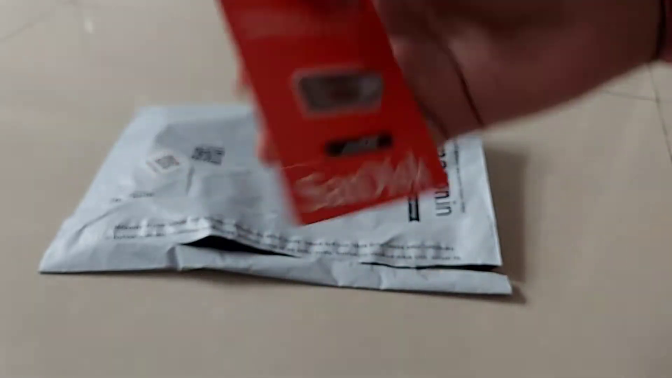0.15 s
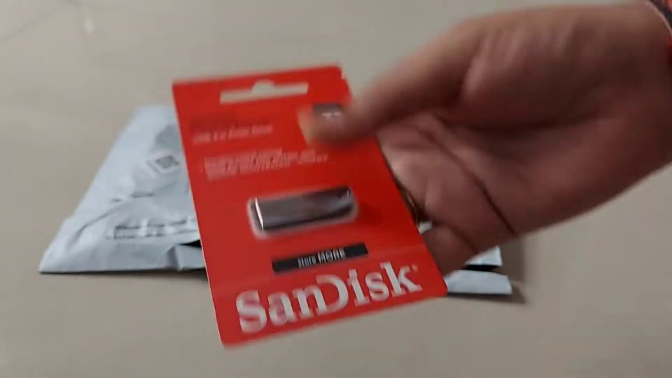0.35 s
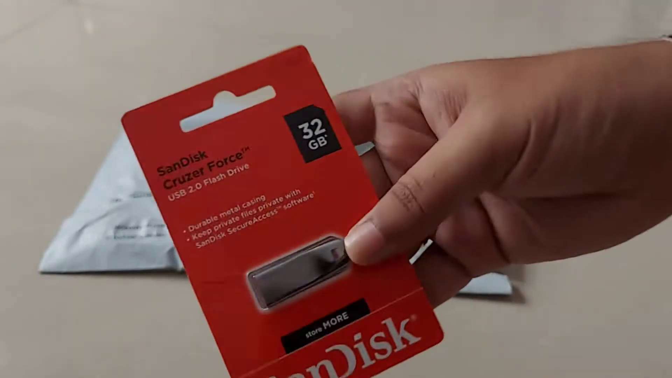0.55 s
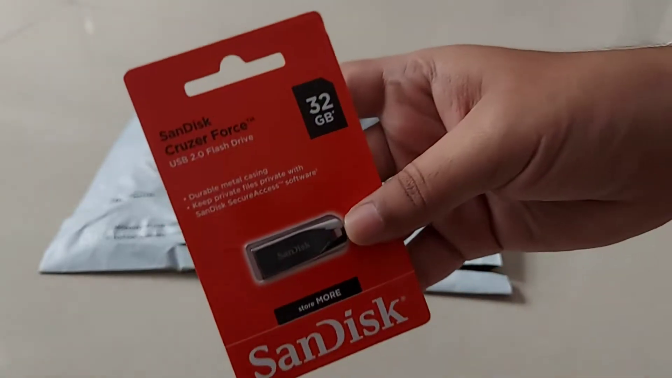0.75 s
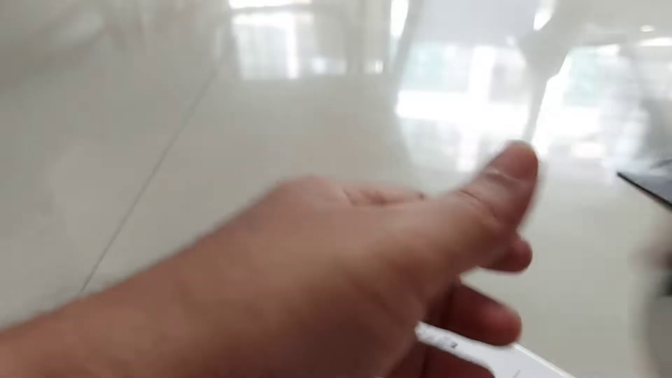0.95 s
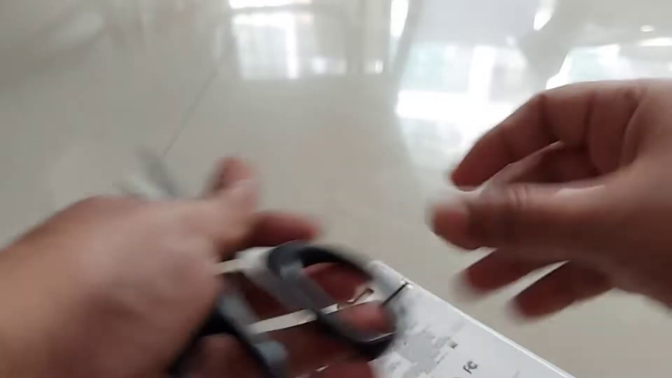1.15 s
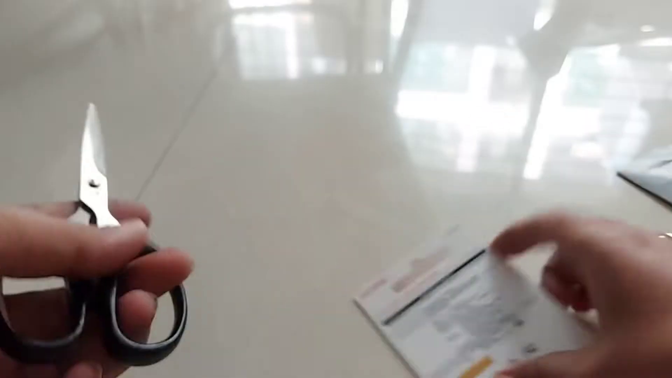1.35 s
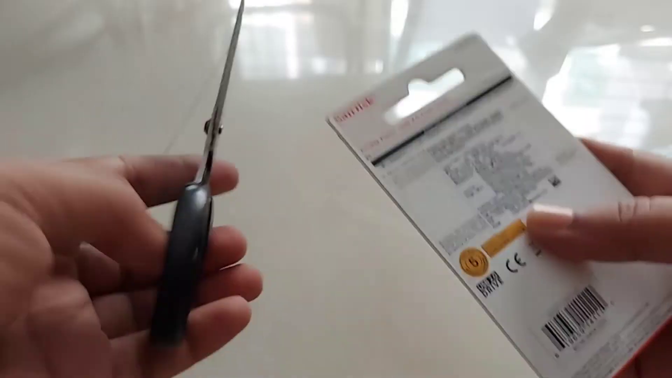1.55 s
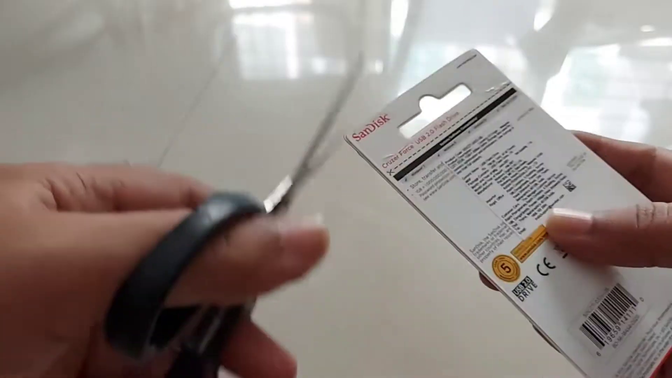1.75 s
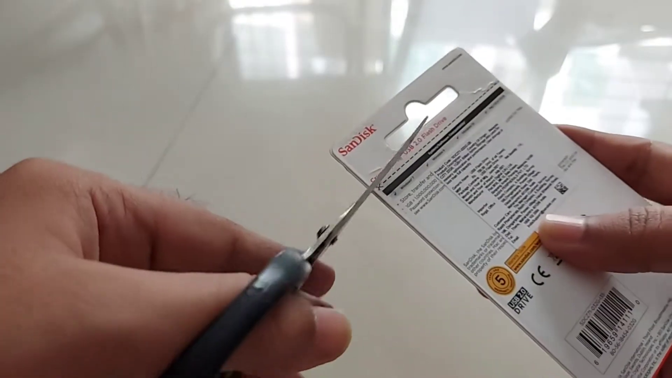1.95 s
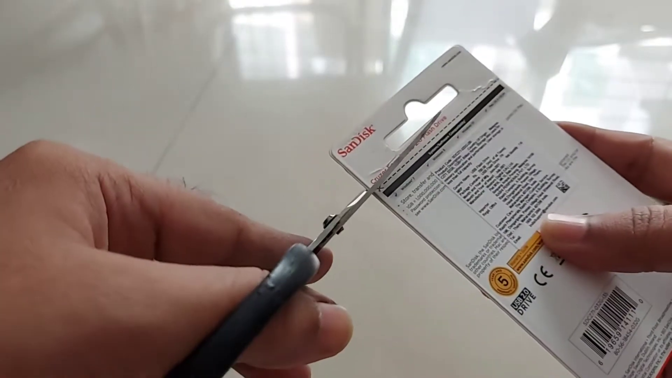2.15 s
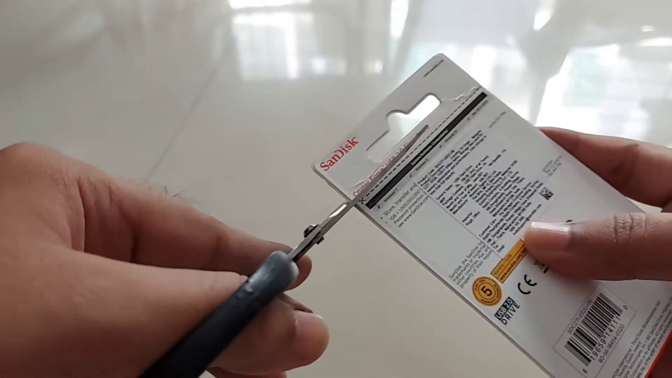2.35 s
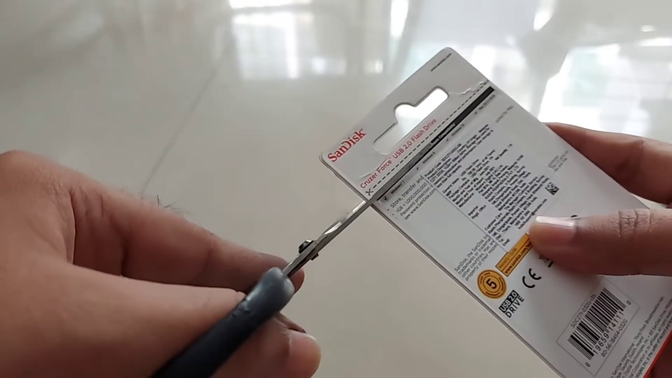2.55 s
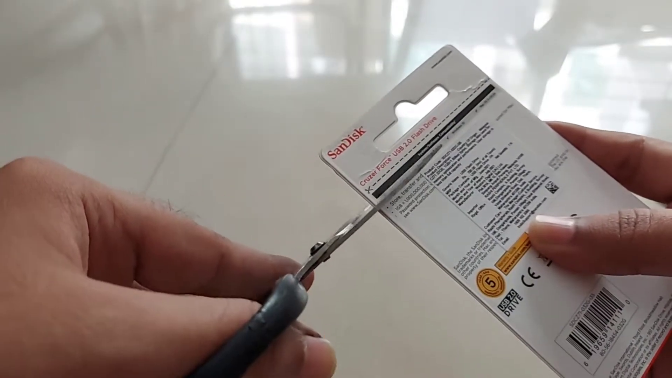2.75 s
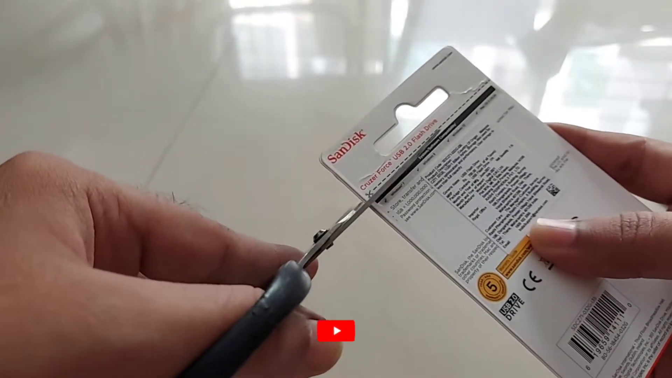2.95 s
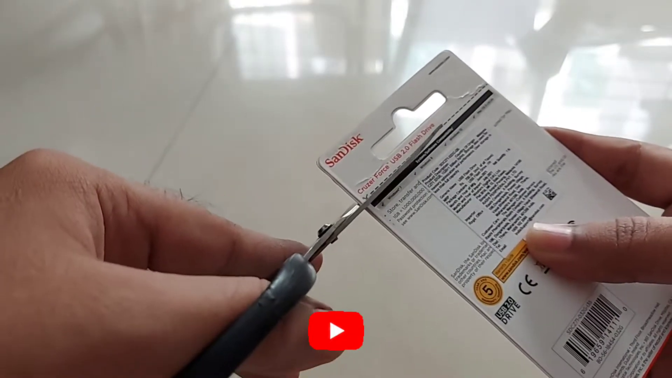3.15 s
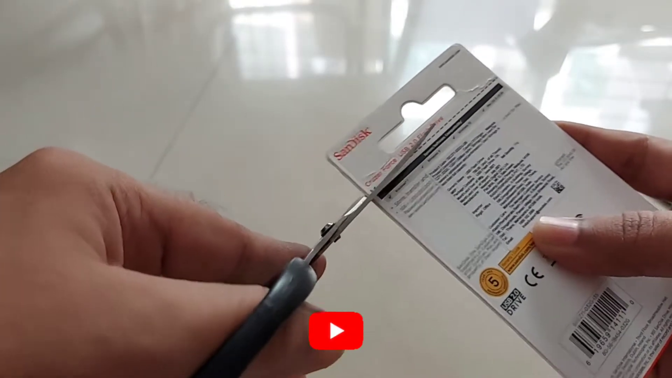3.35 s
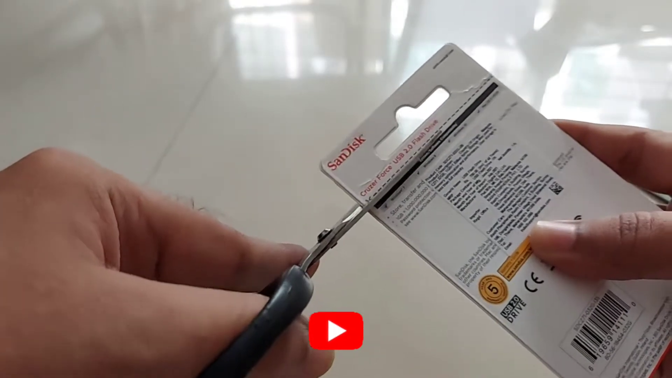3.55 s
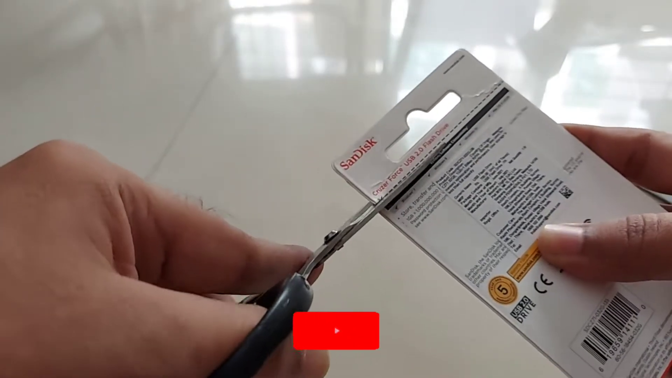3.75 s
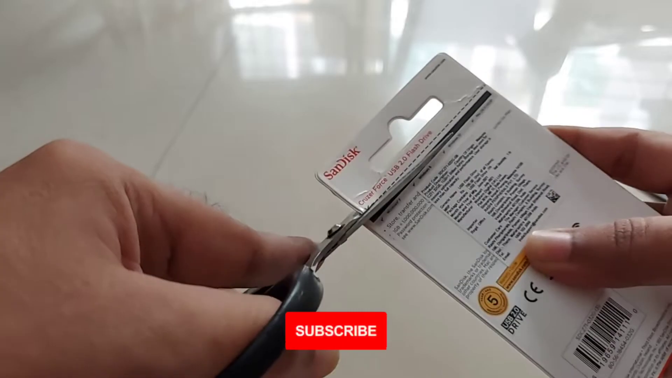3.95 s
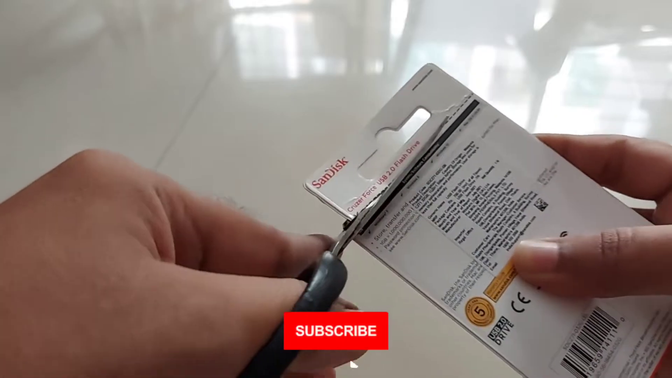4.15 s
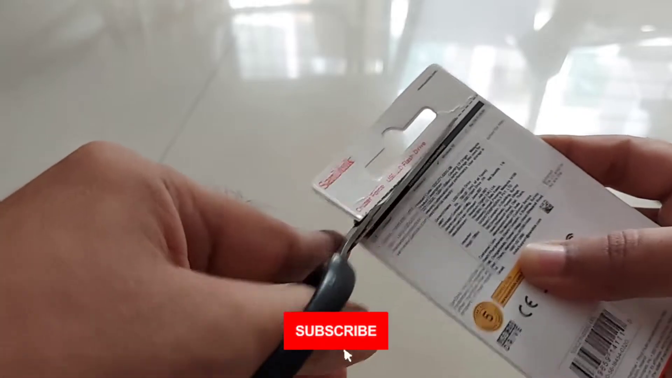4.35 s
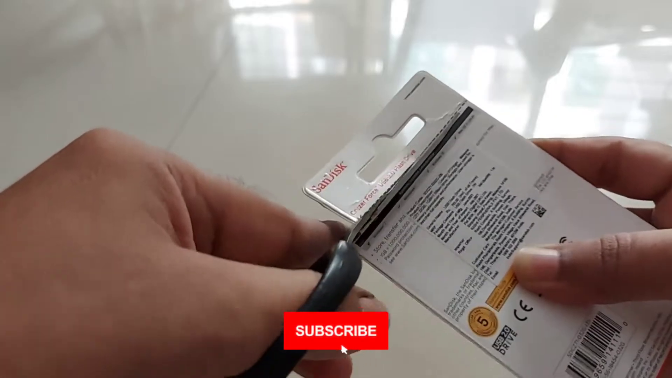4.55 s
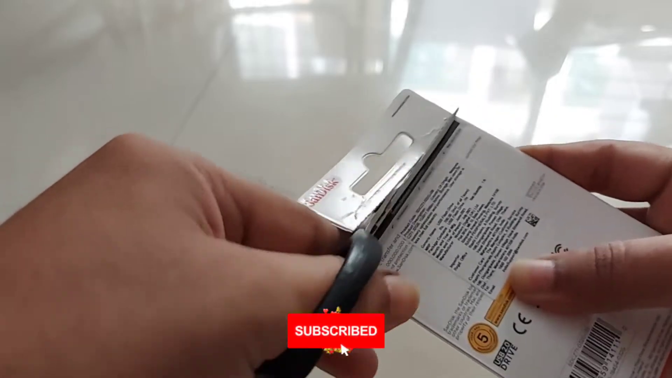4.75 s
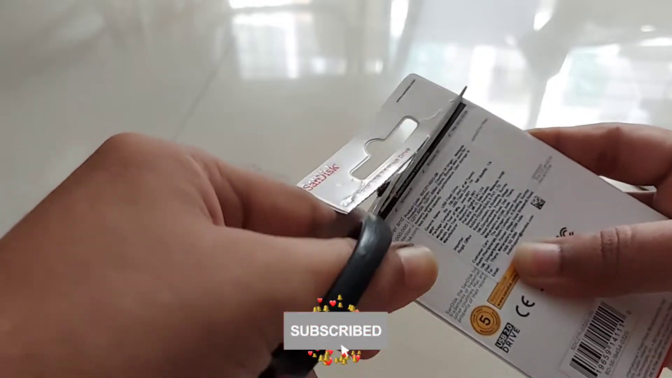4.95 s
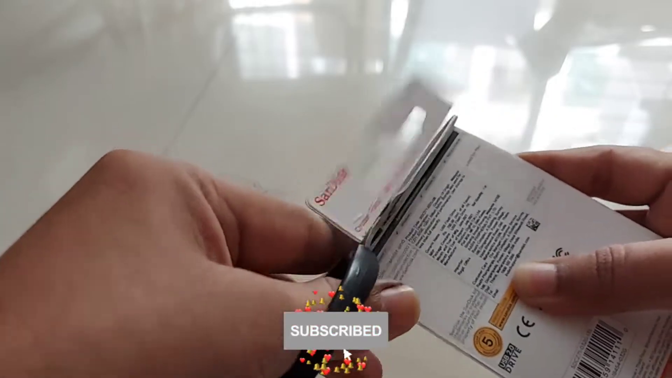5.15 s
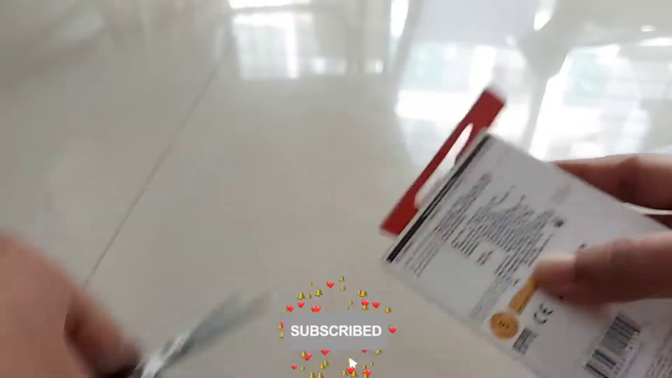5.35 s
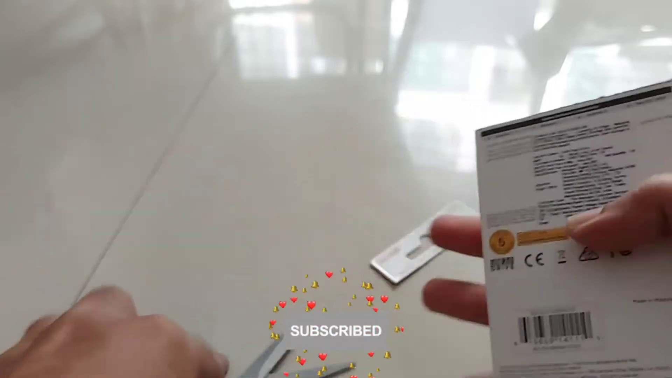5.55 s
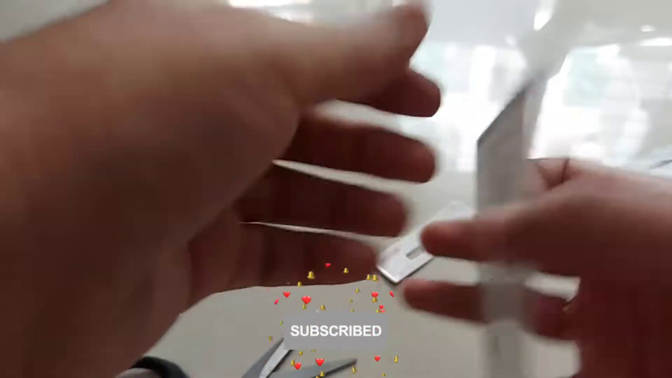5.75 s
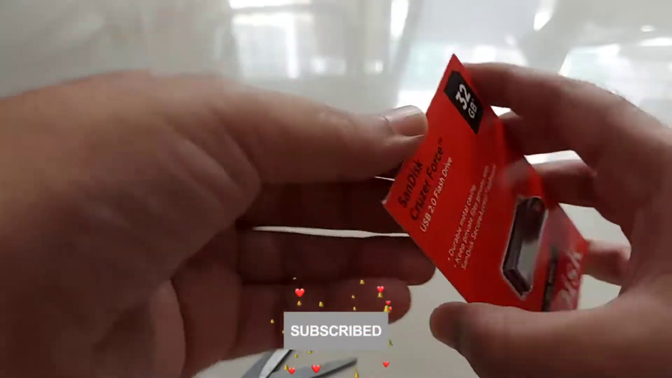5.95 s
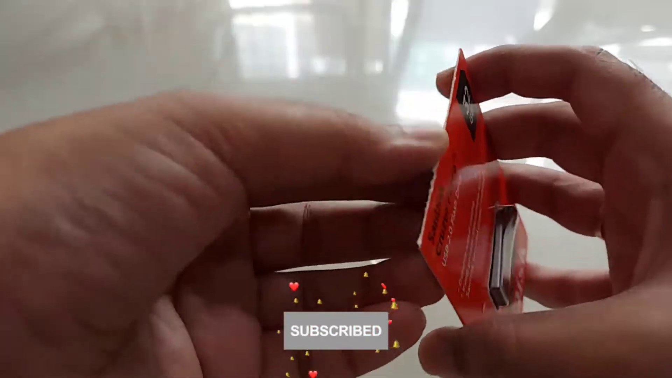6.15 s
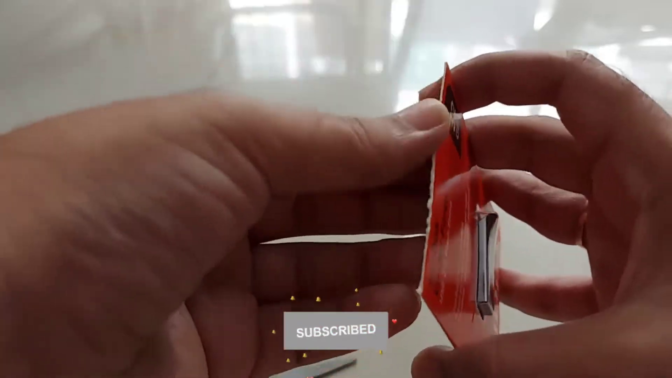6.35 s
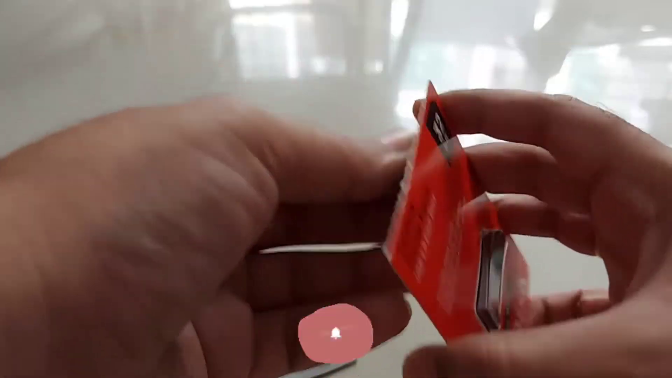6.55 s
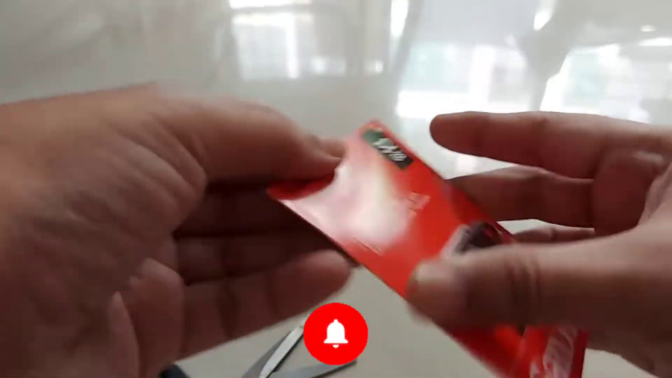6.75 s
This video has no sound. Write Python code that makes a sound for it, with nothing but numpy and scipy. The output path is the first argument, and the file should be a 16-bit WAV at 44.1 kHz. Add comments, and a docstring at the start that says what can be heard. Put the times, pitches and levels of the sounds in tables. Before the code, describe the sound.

A quiet indoor place with hard, reflective surfaces, heard close up over low rumble and a faint distant traffic wash. Fingers slide softly on card from 0 to 0.5 seconds. Scissors knock sharply at about 0.85, then clink lightly between 1.05 and 1.3, with card taps at 1.3 to 1.4. Five distant reverberant swishes, like a broom on tiles, come about every half second from 1.15 to 3.0. A very faint rising whistle at 3.4 is followed by a clearer one at 3.85. From 3.8 to 4.8 the blades crush and crack stiff card in irregular crisp jerks. At 5.16 they snap shut, the loudest sound, with a low air thump and dull knocks. A strip taps at 5.4, scissors clatter brightly down at 5.5 to 5.6, then light finger rubs and card taps continue to 6.8.

```python
"""Fingers slide over a card blister pack, then small steel scissors are picked up with clicks from a tiled floor.
Five far swishes, as of a broom on tiles, begin among the clicks and go on after them, in noise that dies away.
Later a thin whistle calls twice, gliding up, and the blades crush and break the card in jerks, as noise ringing
its resonances; then they snap shut with a puff of air, the strip drops, the scissors are laid down as bursts of
noise ring the steel, and fingers turn the card. Shaped noise rumbles throughout; a hard room answers near sounds."""
import sys
import numpy as np
from scipy import signal
from scipy.io import wavfile
from scipy.ndimage import uniform_filter1d

SR = 44100
rng = np.random.default_rng(int(sys.argv[2]) if len(sys.argv) > 2 else 0)


def master(y):
    """Save y as 16-bit WAV."""
    cut = np.clip(np.atleast_2d(y).T, -1, 1)
    pcm = np.round(cut * 32767)  # scale
    wavfile.write(sys.argv[1], SR, pcm.astype(np.int16))


N = 299880
TIME = np.arange(N) / SR


def from_db(db):
    """Turn decibels into a gain."""
    return 10 ** (np.asarray(db) / 20)


def rms_one(x):
    """Scale to unit power."""
    return x / np.sqrt(np.mean(x ** 2) + 1e-20)


def at_hz(points, hz):
    """Read a curve over frequency, with straight lines on a log-frequency axis."""
    points_hz, values = np.array(points).T
    return np.interp(np.log(hz), np.log(points_hz), values)


def over_time(rows):
    """Join (seconds, value) points by straight lines and read the curve at every sample."""
    s, values = np.transpose(rows)
    return np.interp(TIME, s, values)


def panned(pan_db):
    """Left and right gains at constant power; a positive pan makes the left louder."""
    return rms_one(from_db(np.array([[pan_db], [-pan_db]]) / 2))


def band(x, low, high):
    """Keep only what lies between two frequencies in hertz."""
    return signal.sosfilt(signal.butter(2, [low, high], "band", fs=SR, output="sos"), x)


def resonate(x, hz, width_hz):
    """Ring one resonance, with a gain of about 1 at its peak."""
    r = np.exp(-np.pi * width_hz / SR)
    feed = np.array([1, 0, -1]) * (1 - r * r) / 2
    feedback = [1, -2 * r * np.cos(2 * np.pi * hz / SR), r * r]
    return signal.lfilter(feed, feedback, x + 1e-18)


def add(out, s, sound):
    """Mix a sound in at time s, cutting off what falls outside the scene."""
    i = round(s * SR)
    sound, i = sound[:, max(-i, 0):], max(i, 0)
    out[:, i:i + sound.shape[1]] += sound[:, :max(N - i, 0)]


def wander(per_s):
    """Slow random drift with a spread of about 1: new chance values, per_s of them a second, joined by lines."""
    return np.interp(TIME * per_s, np.arange(200), rng.standard_normal(200))


def narrow_noise(hz, width_hz):
    """A narrow band of unit-power noise whose centre follows hz, stirred separately at each ear."""
    stir = rng.standard_normal((2, N)) + 1j * rng.standard_normal((2, N))
    stir = signal.sosfilt(signal.butter(2, width_hz / 2, fs=SR, output="sos"), stir)
    carrier = np.exp(2j * np.pi * np.cumsum(hz) / SR)
    return rms_one(np.real(stir * carrier))


# How alike the two ears are. Each row: frequency in Hz, left-right correlation (no unit).
EAR_LIKENESS = [(30, 0), (100, 0.56), (300, 0.68), (700, 0), (1500, 0), (4000, 0), (16000, 0.18)]
EDGES_HZ = 22 * 2 ** np.arange(0, 9.9, .5)   # edges of the half-octave bands


def noise_bands(size):
    """Half-octave bands of stereo noise, most alike at the ears in the bass around 100 to 300 Hz."""
    white = rng.standard_normal((2, 2, size))
    for k, (low, high) in enumerate(zip(EDGES_HZ, EDGES_HZ[1:])):
        mid, side = band(white[k % 2], low, high)   # neighbouring bands use different noise
        hz = np.sqrt(low * high)
        alike = np.clip(at_hz(EAR_LIKENESS, hz), -1, 1)
        yield hz, np.sqrt(1 + alike) * mid + np.sqrt(1 - alike) * side * [[1], [-1]]


def colour_noise(bands, spectrum):
    """Mix noise bands into one unit-power noise with the given spectrum."""
    return rms_one(sum(x * from_db(at_hz(spectrum, hz)) for hz, x in bands))


def dying_noise(spectrum, t60s):
    """One second of diffuse sound in which each band dies at its own pace."""
    t = TIME[:SR]
    return sum(x * from_db(at_hz(spectrum, hz) - 60 * t / at_hz(t60s, hz)) for hz, x in noise_bands(SR))


# Colour of the low rumble. Each row: frequency in Hz, relative strength in dB per Hz.
RUMBLE_COLOUR = [(13, -62), (22, -42.5), (32, -22), (40, -0.5), (55, -10.5), (76, 3), (172, -8), (282, -9),
                 (320, -26.5), (450, -39), (580, -51), (990, -120)]
# How loud the low rumble is. Each row: time in seconds, level in dB.
RUMBLE_LEVEL = [(0, -56.5), (.36, -54), (.65, -57.5), (1.2, -55.5), (1.5, -58.5), (3.0, -58.5), (4.0, -59),
                (5.9, -59.5), (6.8, -58)]


def outdoor_rumble(bands):
    """Bass-heavy noise whose level slowly drifts."""
    return from_db(over_time(RUMBLE_LEVEL)) * colour_noise(bands, RUMBLE_COLOUR)


# Swells of the low drone. Each row: middle in seconds, half length in seconds, level in dB.
DRONE_SWELLS = [(2.193, 0.12, -50), (2.68, 0.077, -51)]


def low_drone():
    """A low tone of slightly wandering pitch swells and sinks."""
    hz = 73.5 + 1.08 * wander(per_s=9.1)
    tone = rms_one(np.sin(2 * np.pi * np.cumsum(hz) / SR))
    swells = sum(from_db(db) * np.exp(-.5 * ((TIME - s) / half_s) ** 2) for s, half_s, db in DRONE_SWELLS)
    return swells * tone


# Colour of the traffic wash. Each row: frequency in Hz, relative strength in dB per Hz.
WASH_COLOUR = [(220, -32.5), (380, -33), (504, -12), (678, -4), (913, -5.5), (1390, -18), (1630, -14),
               (1850, -20.5), (2000, -40), (2370, -22), (3090, -39.5), (3350, -25.5), (5030, -33),
               (7790, -27.5), (16000, -39.5)]
# How the far traffic rises and falls. Each row: time in seconds, relative level in dB.
TRAFFIC_LEVEL = [(0.0, -70.5), (0.32, -66.5), (0.62, -73.5), (0.89, -67), (1.04, -62.5), (1.97, -70.5),
                 (3.5, -69), (3.67, -66.5), (5.3, -69), (5.61, -68.5), (6.27, -69.5), (6.8, -72)]
WASH_DB, WHIR_DB = -0.5, -2.5   # added to the traffic level
WHIR_SWING = 1.4   # the whir rises and falls this many times as far, in dB
WHIR_HZ, WHIR_WANDER_HZ = 715.4, 49.94


def far_traffic(bands):
    """A wash of coloured noise and a whir of narrow noise with wandering pitch, both led by one level."""
    level_db = over_time(TRAFFIC_LEVEL)
    mean_db = level_db.mean()
    wash = from_db(WASH_DB + level_db) * colour_noise(bands, WASH_COLOUR)
    whir_db = WHIR_DB + mean_db + WHIR_SWING * (level_db - mean_db)
    whir = from_db(whir_db) * narrow_noise(WHIR_HZ + WHIR_WANDER_HZ * wander(per_s=4), width_hz=120)
    return wash + whir


def background():
    """Rumble, drone and far traffic, all a little to the right."""
    bands = list(noise_bands(N))
    low = outdoor_rumble(bands) + low_drone()
    return panned(pan_db=-6.0) * low + panned(pan_db=-3.0) * far_traffic(bands)


# Calls of a thin whistle. Each row: start in seconds, length in seconds, starting pitch in Hz,
# relative level in dB before the echoes.
WHISTLES = [(3.38, 0.21, 1888, -75), (3.841, 0.36, 2387, -60.5)]
GLIDE_HZ_PER_S, WHISTLE_WIDTH_HZ = 1000, 85


def far_whistles(t60_s):
    """Each call swells and fades as its pitch climbs; echoes smear it into overlapping strands."""
    out = np.zeros((2, N))
    for s, length_s, hz, db in WHISTLES:
        age = np.clip(TIME - s, 0, length_s)
        swell = from_db(db) * np.sin(np.pi * age / length_s)
        out += swell * narrow_noise(hz + GLIDE_HZ_PER_S * age, WHISTLE_WIDTH_HZ)
    echoes = rng.standard_normal((2, SR)) * from_db(-60 * TIME[:SR] / t60_s)
    return signal.fftconvolve(out, echoes / np.linalg.norm(echoes[0]), axes=1)[:, :N]


# Far strokes. Each row: start in seconds, level in dB over the first fifteenth of a second.
SWISHES = [(1.155, -47.5), (1.661, -49), (2.100, -50.5), (2.502, -48.5), (3.005, -49)]
# Colour of a stroke. Each row: frequency in Hz, relative strength in dB per Hz.
SWISH_COLOUR = [(400, -23.5), (700, -4), (1300, -8), (1800, -3.5), (2300, 2.5), (3100, -1.5), (5000, -7),
                (7500, -5.5), (10000, -9.5), (13000, -15.5), (16000, -16)]
# How long a stroke rings on. Each row: frequency in Hz, time in seconds to fall by 60 dB.
SWISH_T60 = [(1000, 0.7), (2500, 0.49), (6000, 0.53), (14000, 0.2)]
LEFT_LAG_S, SHARED = 0.000452, 0.13   # delay at the left ear, share of the right ear's sound mixed into it


def far_swishes(rise_s, stroke_s, pan_db):
    """Short strokes far off to the right: they swell briefly and are heard mostly as reverberation."""
    out, t = np.zeros((2, N)), TIME[:SR]
    swell = (1 - np.exp(-t / rise_s)) * (1 - .5 * np.exp(-t / stroke_s))
    for s, db in SWISHES:
        left, right = dying_noise(SWISH_COLOUR, SWISH_T60) * swell
        late_right = np.interp(t - LEFT_LAG_S, t, right)
        x = np.array([np.sqrt(1 - SHARED ** 2) * left + SHARED * late_right, right])
        add(out, s, panned(pan_db) * from_db(db) * x / np.std(x[:, :SR // 15]))
    return out


# Colour of the room's answer. Each row: frequency in Hz, relative strength in dB.
ROOM_COLOUR = [(200, -5.5), (800, -4), (2500, 1.5), (7000, -2), (14000, 2)]
# How long the room rings. Each row: frequency in Hz, time in seconds to fall by 60 dB.
ROOM_T60 = [(300, 0.9), (2000, 0.26), (6000, 0.25), (14000, 0.2)]


def room(x, gap_s, build_s, wet_db):
    """Tiles and bare walls answer after a short gap with a dense tail."""
    since_gap = np.maximum(TIME[:SR] - gap_s, 0)
    tail = dying_noise(ROOM_COLOUR, ROOM_T60) * (1 - np.exp(-since_gap / build_s))
    tail = tail / np.sqrt(np.sum(tail ** 2, axis=1, keepdims=True))
    return from_db(wet_db) * signal.fftconvolve(x, tail, axes=1)[:, :N]


# Bass, middle and treble of a struck body. Each row: lower edge in Hz, upper edge in Hz.
ZONES_HZ = [(170, 1500), (1500, 6000), (6000, 16000)]


def body(force, modes, direct_db, zone_db, heard):
    """A force rings the modes; the bass, middle and treble levels are set over the stretch `heard`."""
    x = from_db(direct_db) * force
    for k, (hz, width_hz, db) in enumerate(modes):
        x = x + (-1) ** k * from_db(db) * resonate(force, hz, width_hz)
    # alternate signs join the zones without gaps
    zones = [(-1) ** k * band(x, *edges) for k, edges in enumerate(ZONES_HZ)]
    return sum(z * from_db(db) / np.sqrt(np.mean(z[:, heard] ** 2)) for z, db in zip(zones, zone_db))


def port_noise(size):
    """White noise at two microphone ports, shared only at long wavelengths."""
    own = rng.standard_normal((2, size))
    long_waves = signal.sosfilt(signal.butter(1, 1800, fs=SR, output="sos"), own)
    return own - long_waves + long_waves[0]


def blows(rows, modes, direct_db, scatter_db, rise_s, level_db):
    """Each contact is a brief burst of micro-impacts into the body; returns near sound and what reaches the room."""
    near, sent, t = np.zeros((2, N)), np.zeros((2, N)), TIME[:SR // 6]
    attack = slice(0, SR * 8 // 1000)   # levels are set over the first 8 ms
    for s, contact_s, low_db, mid_db, top_db, pan_db, *room_db in rows:
        force = port_noise(len(t)) * np.exp(-t / contact_s) * (1 - np.exp(-t / rise_s))
        zone_db = (low_db, mid_db, top_db)
        add(near, s, panned(pan_db) * body(force, modes, direct_db, zone_db, attack))
        # summed over all directions the modes stand out less, so the room hears a smoother crack
        add(sent, s, from_db(sum(room_db)) * body(force, modes, scatter_db, zone_db, attack))
    return from_db(level_db) * near, from_db(level_db) * sent


def scrapes(rows, modes, direct_db, friction, grains_per_s, grain_db, level_db):
    """A swell of friction noise with tiny slips of uneven size rings the body."""
    out, t = np.zeros((2, N)), TIME[:SR] - .5
    for s, half_s, low_db, mid_db, top_db, pan_db in rows:
        slip_here = rng.random(len(t)) < grains_per_s / SR
        slip_size = from_db(grain_db * np.minimum(rng.exponential(1, len(t)), 3))
        fade = np.exp(-1 / (0.00029 * SR))   # a slip dies to 1/e in 0.29 ms
        grain = signal.lfilter([1], [1, -fade], slip_here * slip_size)
        force = port_noise(len(t)) * (friction + grain) * np.exp(-.5 * (t / half_s) ** 2)
        sound = body(force, modes, direct_db, (low_db, mid_db, top_db), abs(t) < half_s)
        add(out, s + t[0], panned(pan_db) * sound)
    return from_db(level_db) * out


# Dull knocks of handles, strip and fingers. Each row: start in seconds, pitch in Hz,
# strength in dB before damping and panning.
KNOCKS = [(3.191, 1620, -45), (5.048, 268, -39.5), (5.1625, 218, -29), (5.211, 594, -36.5),
          (5.2766, 1150, -31), (5.582, 291, -32), (5.5964, 512, -34), (6.5734, 596, -38.5),
          (6.658, 113, -44)]
KNOCK_CYCLES = 1.13   # cycles in which a knock falls to 1/e


def knocks(pan_db):
    """A soft contact rings one heavily damped resonance."""
    out, t = np.zeros((2, N)), TIME[:SR // 10]
    for s, hz, db in KNOCKS:
        ring = np.sin(2 * np.pi * hz * t) * np.exp(-hz * t / KNOCK_CYCLES)
        add(out, s, panned(pan_db) * from_db(db) * ring)
    return out


# Fingers and card sliding. Each row: middle in seconds, half length in seconds,
# relative mid level in dB, bass above mid in dB.
RUBS = [(0.025, 0.16, -67.5, -4), (0.381, 0.095, -70, 5), (0.719, 0.34, -82, 4), (1.023, 0.017, -67, -6),
        (1.382, 0.088, -71.5, -25), (1.532, 0.15, -84, -13), (5.103, 0.023, -63.5, -3),
        (5.473, 0.033, -64.5, -0.5), (5.808, 0.013, -63.5, -10.5), (6.191, 0.012, -67, -13.5),
        (6.276, 0.014, -74.5, -7), (6.67, 0.083, -70, -2.5), (6.796, 0.0074, -59, -7)]
# Resonances of skin on card. Each row: frequency in Hz, width in Hz, relative strength in dB.
RUB_MODES = [(237, 220, 15.5), (504, 940, 6), (1750, 1000, -6.5), (4000, 2000, -10), (7130, 2700, -3),
             (13100, 14000, -2.5)]


def fingers(top_db, pan_db):
    """Skin and card slide over each other; a firmer grip adds bass."""
    rows = [(s, half_s, db + bass_db, db, db + top_db, pan_db) for s, half_s, db, bass_db in RUBS]
    return scrapes(rows, RUB_MODES, direct_db=-15.5, friction=1.0, grains_per_s=740, grain_db=1.2, level_db=-1.0)


# Crisp cracks and taps of the card. Each row: start in seconds, relative mid level in dB.
CARD_HITS = [(1.278, -42), (1.4199, -54), (5.0468, -43), (5.1037, -55), (5.4164, -47), (5.84, -61),
             (6.1856, -67), (6.571, -57.5)]
# Resonances of the card. Each row: frequency in Hz, width in Hz, relative strength in dB.
CARD_MODES = [(271.4, 25, 8.5), (650, 26, 7.5), (1200, 410, 0.5), (1720, 71, -1), (2590, 1800, -7),
              (3287, 240, 4.5), (6860, 200, -6.5), (11400, 630, -7)]
CARD_CONTACT_S, CARD_PAN_DB = 0.0039, 1.5
CARD_LOW_DB, CARD_TOP_DB = -9, -1.5   # bass and treble against mid


def card():
    """Brief contacts ring the card, all with one contact time and one balance of bass and treble."""
    rows = [(s, CARD_CONTACT_S, db + CARD_LOW_DB, db, db + CARD_TOP_DB, CARD_PAN_DB) for s, db in CARD_HITS]
    return blows(rows, CARD_MODES, direct_db=-8, scatter_db=2.5, rise_s=0.0014, level_db=-2.0)


# The blades advance through the card in jerks. Each row: start of the break in seconds,
# half length of the crushing in seconds, relative crushing level in dB, relative break level in dB.
CUTS = [(3.78, 0.028, -58.5, -68), (3.88, 0.0096, -63, -81), (4, 0.013, -61, -60.5),
        (4.0438, 0.014, -64, -53.5), (4.138, 0.01, -54.5, -76), (4.27, 0.013, -58, -70),
        (4.296, 0.0072, -51, -58.5), (4.39, 0.014, -60.5, -72), (4.49, 0.0096, -52.5, -58),
        (4.664, 0.0038, -59, -72), (4.692, 0.031, -54, -50), (4.775, 0.0072, -59, -69)]
# Resonances of the card being cut. Each row: frequency in Hz, width in Hz, relative strength in dB.
CUT_MODES = [(710, 120, -4.5), (1140, 100, 0), (2640, 1140, -7), (3750, 110, 1.5), (7400, 220, -4.5),
             (11150, 1640, 10.5), (14200, 1900, 3)]
CRUSH_LAG_S, CUT_PAN_DB = .006, 1   # the crushing is centred this long after the break starts
CUT_COLOUR_DB = np.array([0.5, 0, 0])   # bass, mid, treble


def cutting(break_s):
    """Each advance of the blades crushes fibres, and the card breaks in the midst of it."""
    breaks = [(s, break_s, *(db + CUT_COLOUR_DB), CUT_PAN_DB) for s, _, _, db in CUTS]
    crushes = [(s + CRUSH_LAG_S, half_s, *(db + CUT_COLOUR_DB), CUT_PAN_DB) for s, half_s, db, _ in CUTS]
    snips, sent = blows(breaks, CUT_MODES, direct_db=-15.5, scatter_db=5, rise_s=0.0013, level_db=-1.5)
    bites = scrapes(crushes, CUT_MODES, direct_db=-7, friction=.45, grains_per_s=400, grain_db=5, level_db=-11.0)
    return snips + bites, sent + bites


def jolt(s, hz, length_s, db, pan_db):
    """The shutting handles jerk the card, which pushes a short swing of air at the microphone."""
    out, t = np.zeros((2, N)), TIME[:SR // 5]
    swing = np.sin(2 * np.pi * hz * t) * np.exp(-(t / length_s) ** 2)
    add(out, s, panned(pan_db) * from_db(db) * swing)
    return out


# Scissors knocking, shutting, laid down. Each row: start in seconds, contact time in seconds,
# relative mid level in dB, bass above mid in dB, treble above mid in dB, left above right in dB,
# extra level sent to the room in dB.
SCISSOR_HITS = [(.8478, 0.018, -41.5, -11, -6.5, 1, -1), (.868, 0.0027, -30.5, -15, -11.5, -8, -4.5),
                (1.0493, 0.0031, -49, -12, 7, 20, -1), (1.056, 0.00078, -45.5, -10, 9, -28, -16),
                (1.1, 0.0072, -53.5, -9, 16, 4, -7.5), (1.172, 0.0031, -47.5, -12, 11.5, 1.5, -14),
                (1.301, 0.0026, -40, -18, 4, 9, -10), (1.3106, 0.0023, -37.5, -19, -7, 5, -10),
                (1.551, 0.0046, -64.5, -9, 13.5, 7, 3), (5.1644, 0.0015, -24, -8.5, 8, 4, 0),
                (5.5018, 0.012, -55.5, -7.5, 18, -1, -5), (5.576, 0.0073, -52.5, -14, 22.5, -22, -4),
                (5.5828, 0.0044, -39, -5, 19, 2, -7), (5.5966, 0.0078, -42.5, -3, 14.5, 12, -3)]
# Resonances of the steel. Each row: frequency in Hz, width in Hz, relative strength in dB.
STEEL_MODES = [(240, 150, -4), (620, 350, 0), (2090, 93, 6), (2750, 330, 0), (3600, 240, 0),
               (4150, 300, -1), (5250, 500, 2), (7470, 200, 3), (8300, 300, -3), (10030, 200, 3),
               (11200, 150, 0), (12600, 200, 8), (13360, 300, 8), (15300, 250, -6)]


def scissors():
    """Brief contacts ring the steel; where the scissors are struck sets their bass and brightness."""
    rows = [(s, contact_s, db + bass_db, db, db + bright_db, pan_db, room_db)
            for s, contact_s, db, bass_db, bright_db, pan_db, room_db in SCISSOR_HITS]
    return blows(rows, STEEL_MODES, direct_db=5.5, scatter_db=12.0, rise_s=0.00011, level_db=-4.54)


def scene():
    """Scissors and card close by, the room around them, the background behind."""
    far = far_swishes(rise_s=0.012, stroke_s=0.024, pan_db=-1) + far_whistles(t60_s=0.71)
    handling = fingers(top_db=-6.0, pan_db=0) + knocks(pan_db=-3)
    cracks, cracks_sent = card()
    cuts, cuts_sent = cutting(break_s=0.0039)
    puff = jolt(s=5.1657, hz=72, length_s=.0115, db=-21, pan_db=14)
    steel, steel_sent = scissors()
    sent = steel_sent + from_db(-3.5) * (cracks_sent + cuts_sent + handling)
    echo = room(sent, gap_s=0.0053, build_s=0.0044, wet_db=-6.5)
    return background() + far + echo + handling + cracks + cuts + puff + steel


def gain_control(x, threshold_db, depth_db, attack_s, release_db_per_s):
    """Loud cracks turn the gain down after a moment, and it creeps back up."""
    power = uniform_filter1d(np.mean(x ** 2, axis=0), size=SR // 100)
    over_db = np.clip(10 * np.log10(np.maximum(power, 1e-12)) - threshold_db, 0, depth_db)
    # hold each peak, letting it sink at a steady pace
    release_db = release_db_per_s * TIME
    held_db = np.maximum.accumulate(over_db + release_db) - release_db
    r = np.exp(-1 / (attack_s * SR))
    return x * from_db(-signal.lfilter([1 - r], [1, -r], held_db))


# Resonances of the microphone ports. Each row: frequency in Hz, width in Hz, added share (no unit).
PORT_MODES = [(3750, 570, 0.45), (7550, 630, 0.49)]
CUTOFF_HZ = 15900


def record(dry):
    """The ports add two soft resonances, gain ducks after loud cracks, deep bass is thinned and the top cut steeply."""
    x = dry + sum(share * resonate(dry, hz, width_hz) for hz, width_hz, share in PORT_MODES)
    x = gain_control(x, threshold_db=-34, depth_db=10, attack_s=0.2, release_db_per_s=31.5)
    x = signal.sosfilt(signal.butter(1, 35, "high", fs=SR, output="sos"), x)
    return signal.sosfilt(signal.ellip(10, .1, 80, CUTOFF_HZ, fs=SR, output="sos"), x)


dry = scene()
out = record(dry)
master(out)
```